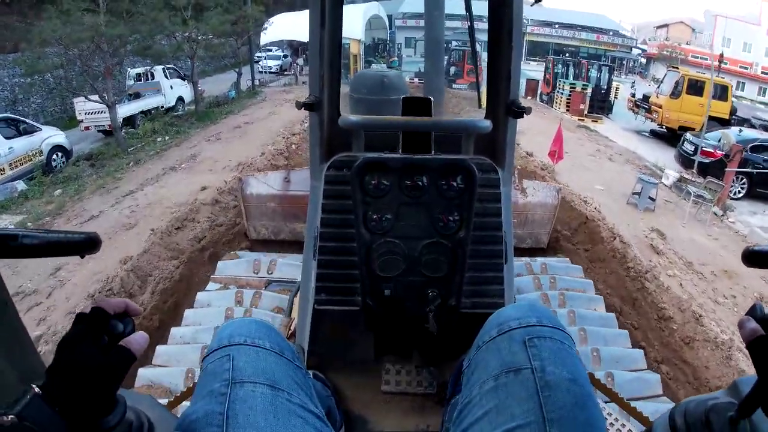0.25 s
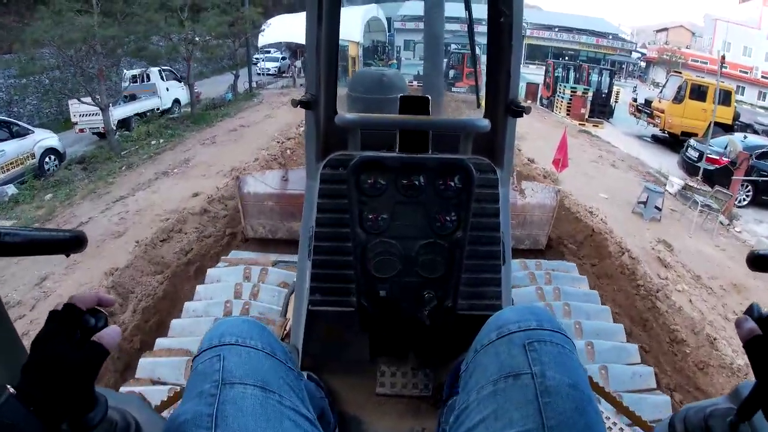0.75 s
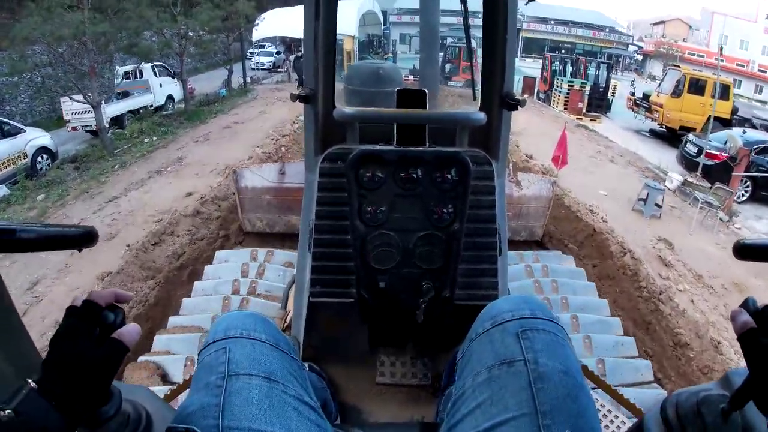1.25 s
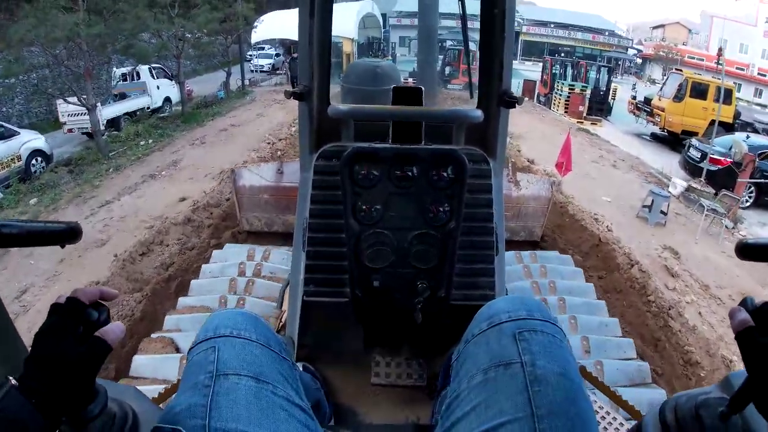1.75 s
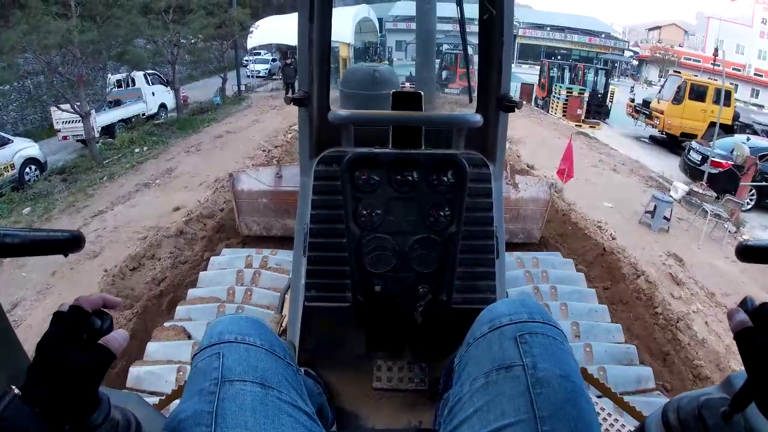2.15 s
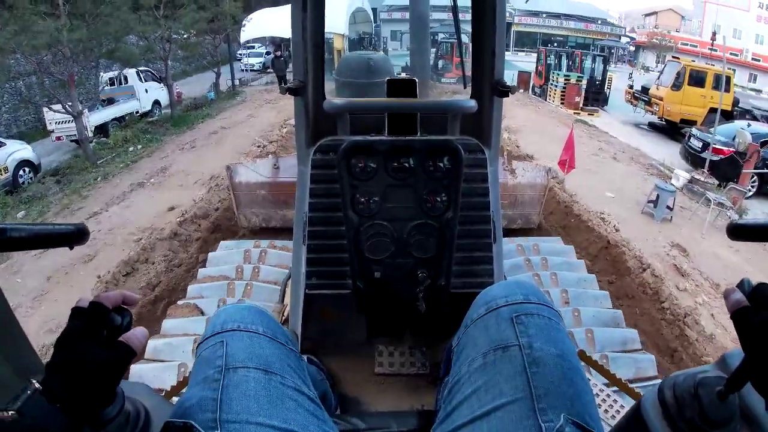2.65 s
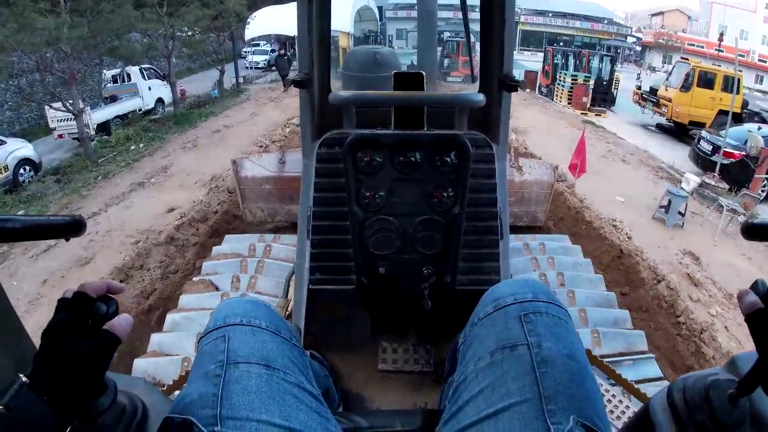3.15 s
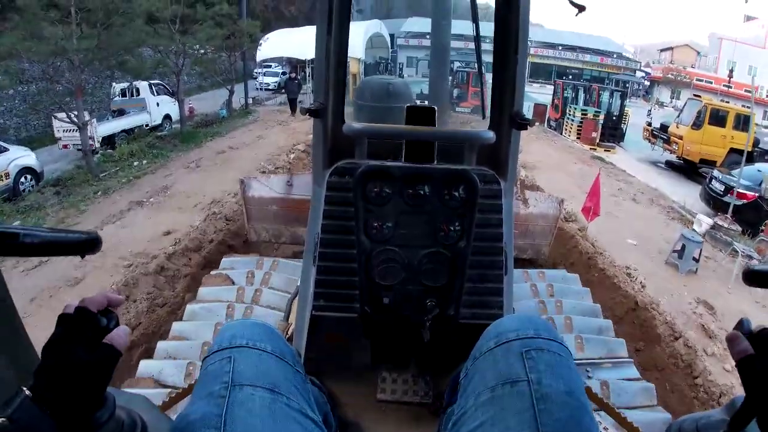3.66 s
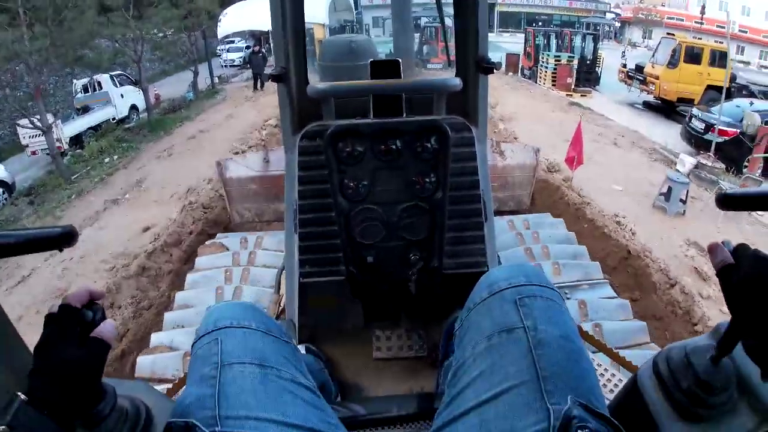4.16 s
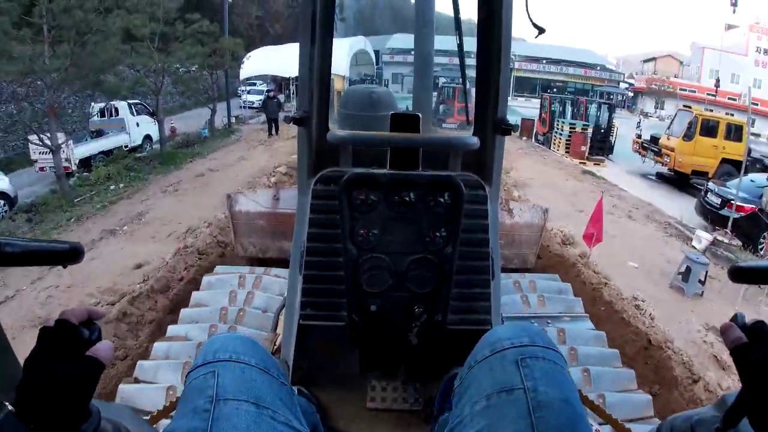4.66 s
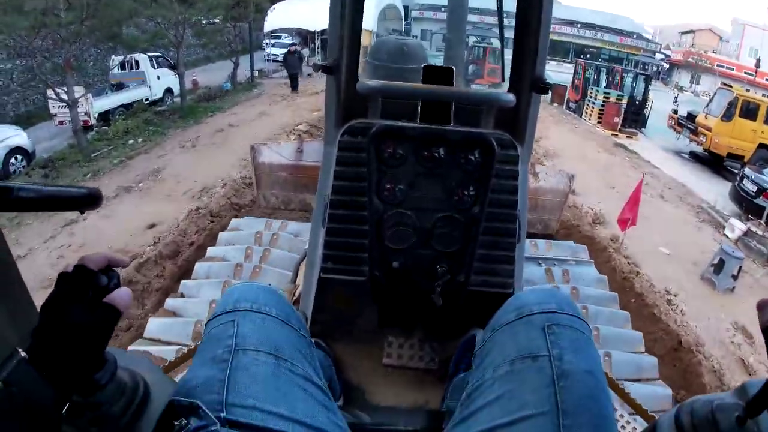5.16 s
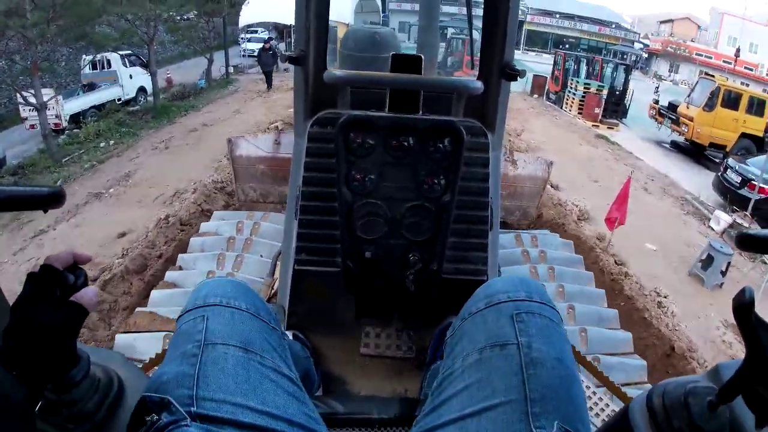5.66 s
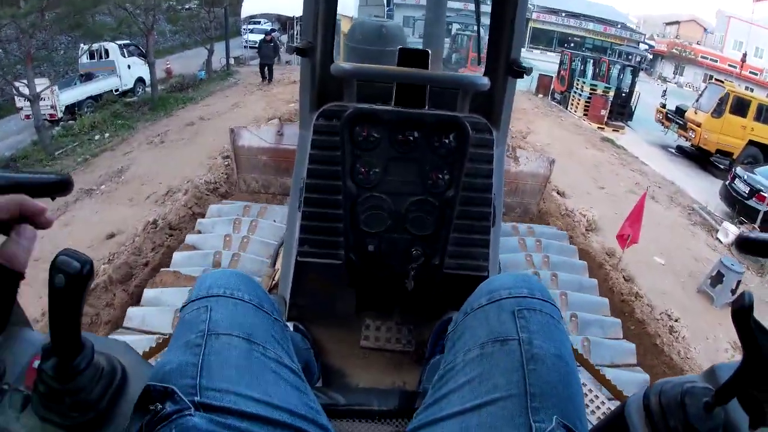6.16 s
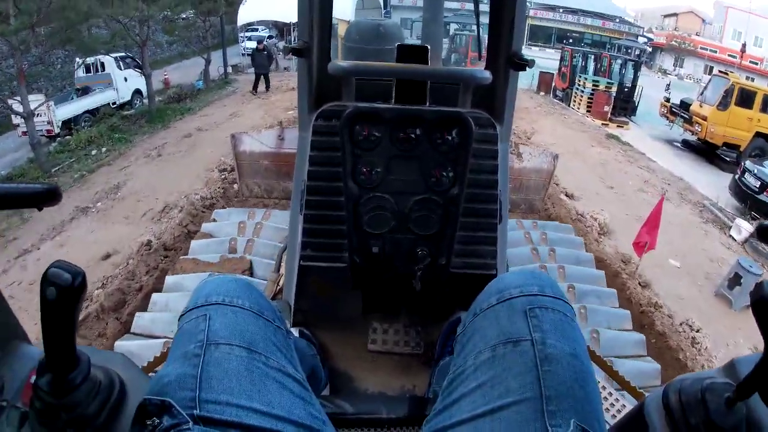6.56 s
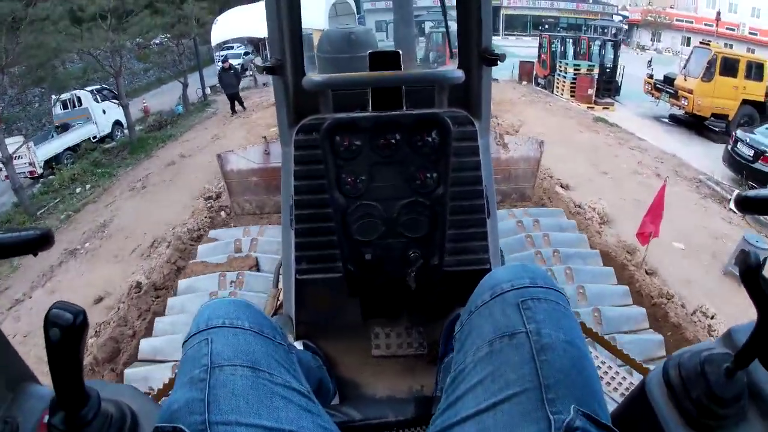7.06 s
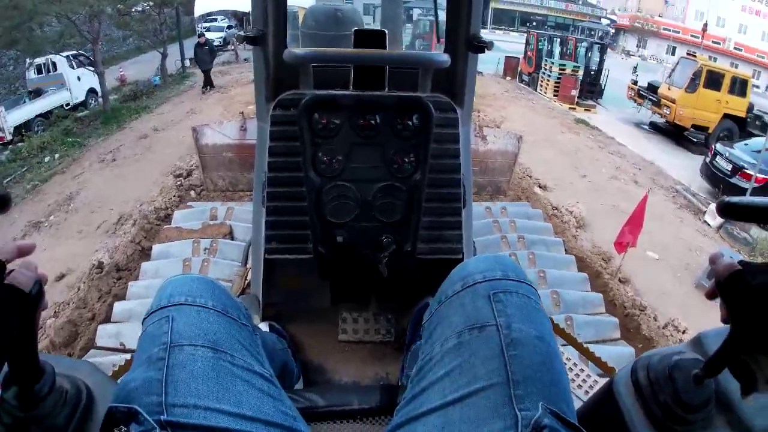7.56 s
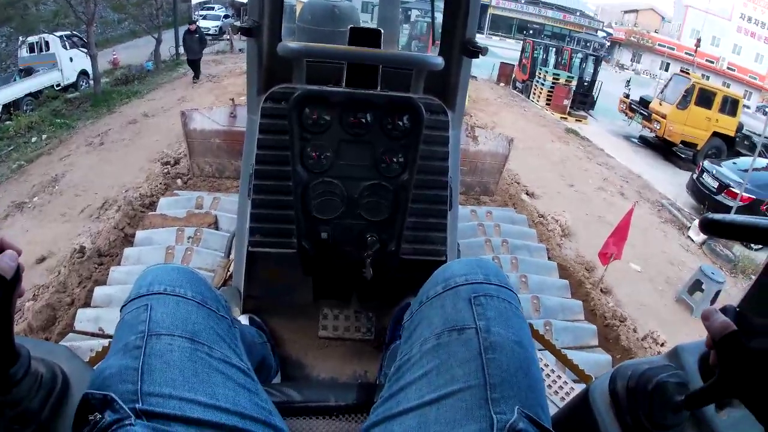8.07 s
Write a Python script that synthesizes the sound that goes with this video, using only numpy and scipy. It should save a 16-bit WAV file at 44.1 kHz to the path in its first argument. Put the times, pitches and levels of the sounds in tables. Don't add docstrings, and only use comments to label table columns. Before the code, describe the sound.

Open-cab bulldozer diesel roars and bogs under repeated load, with low frame booms, rattling panels, track knocks and short dry squeaks, finally dropping toward idle.

```python
import sys
import numpy as np
from scipy import signal
from scipy.fft import rfft, irfft
from scipy.io import wavfile
from scipy.ndimage import uniform_filter1d

SR = 44100
rng = np.random.default_rng(int(sys.argv[2]) if len(sys.argv) > 2 else 0)


def gain_from_db(level_db):
    decades = np.asarray(level_db, float) / 20
    return 10 ** decades


def wav_out(sig):
    wavfile.write(sys.argv[1], SR, np.round(np.clip(np.atleast_2d(sig).T, -1, 1) * 32767).astype(np.int16))


N = 366471


def unit(x):
    return x / np.sqrt(np.mean(x ** 2))


def walk(rate_hz):
    hold = int(SR / rate_hz)
    steps = np.repeat(rng.standard_normal(N // hold + 1), hold)
    slewed = uniform_filter1d(uniform_filter1d(steps, hold), hold)
    return 1.41 * slewed[:N]


def peaks_db(hz, modes):
    return sum(db / (1 + (2 * (hz - f) / width) ** 2) for f, width, db in modes)


def coloured_noise(shape, modes=()):
    hz = np.arange(1, N // 2 + 2) * SR / N
    f, db = np.transpose(shape)
    shape_db = np.interp(np.log(hz), np.log(f), db, -120, -120)
    return rfft(rng.standard_normal(N)) * gain_from_db(shape_db + peaks_db(hz, modes))


def patches(x, patch_hz, patch_s):
    f, t, cells = signal.stft(x, SR, nperseg=1024)
    field = rng.standard_normal(cells.shape)
    field = uniform_filter1d(field, max(1, int(patch_hz / f[1])), axis=0)
    field = uniform_filter1d(field, max(1, int(patch_s / (t[1] - t[0]))), axis=1)
    return cells, f[:, None], unit(field)


def flicker(spectrum, patch_hz, patch_s, patchy_db):
    cells, _, field = patches(irfft(spectrum, N), patch_hz, patch_s)
    return unit(signal.istft(cells * gain_from_db(patchy_db * field), SR)[1][:N])


def add(out, s, sound):
    i = int(s * SR)
    out[i:i + len(sound)] += sound[:N - i]


# start in seconds, end in seconds, pitch in Hz, level in dB rms.
HUMS = [
    (0, 5.1, 597, -40),
    (5.4, 8.6, 802, -48),
    (7.55, 8.8, 732, -46),
    (7.6, 8.8, 700, -47),
    (7.3, 8.1, 544, -41),
    (0, 8.6, 2390, -63),
    (7.9, 8.7, 69.5, -22),
]


def hums():
    t, out = np.arange(N) / SR, np.zeros(N)
    for start, end, hz, db in HUMS:
        swell = np.clip(np.minimum(t - start + 0.21, end - t) / 0.43, 0, 1)
        tone = np.sin(2 * np.pi * hz * t + 0.59 * walk(6))
        out += np.sqrt(2) * gain_from_db(db + 2.0 * walk(6.1)) * swell * tone
    return out


# frequency in Hz, level in dB per Hz.
RUMBLE = [(18, -24), (60, 1), (82, -4.5), (113, -15), (280, -7), (344, -6.5), (477, -19), (566, -19),
          (655, -26.5), (759, -31.5), (831, -27.5), (900, -57), (1170, -67.5), (1980, -120)]


def rumble(db):
    return flicker(coloured_noise(RUMBLE), 61, .1, patchy_db=1.5) * gain_from_db(db - 1.0)


# time in seconds, peak level in dB.
JOLTS = [(.38, -22.5), (.72, -22.5), (.93, -24.5), (1.08, -13.5), (1.36, -22), (1.64, -16.5), (1.89, -14.5),
         (2.21, -18.5), (2.45, -18.5), (2.57, -18), (2.95, -26), (3.15, -19.5), (3.6, -27.5), (3.76, -21.5),
         (3.94, -14), (4.18, -12.5), (4.38, -22.5), (4.6, -19), (4.82, -19), (4.98, -16.5), (5.1, -16),
         (5.38, -21), (5.65, -20.5), (5.97, -16), (6.11, -16.5), (6.63, -15.5), (7.2, -22), (7.34, -19),
         (7.54, -25), (7.74, -24)]
JOLT_RISE_DB_S, JOLT_FALL_DB_S, FRAME_REST_DB = 138.5, 120, -29.5


def jolts():
    t = np.arange(N) / SR
    swells = [db - np.where(t < s, JOLT_RISE_DB_S * (s - t), JOLT_FALL_DB_S * (t - s)) for s, db in JOLTS]
    return np.maximum(np.max(swells, axis=0), FRAME_REST_DB)


SHUDDER_HZ, SHUDDER_WIDTH_HZ = 44.86, 21


def shudder(db):
    hz = np.arange(N // 2 + 1) * SR / N
    mode = 1 / (1 + (2 * (hz - SHUDDER_HZ) / SHUDDER_WIDTH_HZ) ** 2) ** 0.55
    mode *= np.clip(hz / 28, 0, 1) ** 2
    skirt = unit(irfft(rfft(rng.standard_normal(N)) * mode, N))
    boom = np.sin(2 * np.pi * np.cumsum(SHUDDER_HZ * (1 + .035 * walk(8))) / SR)
    return unit(boom + 0.38 * skirt) * gain_from_db(db)


# start in seconds, length in seconds, level in dB.
SCRAPES = [(.13, 0.043, -57), (1.04, 0.016, -54), (3.015, 0.031, -45), (4.004, 0.028, -52),
           (4.069, 0.013, -51), (4.216, 0.037, -45), (5.557, .08, -56), (5.638, 0.024, -52.5),
           (5.85, .07, -44), (5.994, 0.047, -44), (6.106, 0.027, -53), (6.39, 0.098, -57),
           (7.56, 0.024, -49)]


def scrapes():
    out = np.zeros(N)
    band = signal.butter(1, [2500, 6000], "band", fs=SR, output="sos")
    hiss = unit(signal.sosfilt(band, rng.standard_normal(N)))
    hiss = signal.sosfilt(signal.butter(2, 9000, fs=SR, output="sos"), hiss) * gain_from_db(1.5 * walk(150))
    for s, length_s, db in SCRAPES:
        n, i = int(length_s * SR), int(s * SR)
        add(out, s, gain_from_db(db) * np.sin(np.linspace(0, np.pi, n)) * hiss[i:i + n])
    return out


# time in seconds, level in dB.
CLINKS = [
    (7.663, -33),
    (7.679, -49),
]
# frequency in Hz, level in dB, t60 in seconds.
PIN_MODES = [(3170, 3, 0.01502), (5260, 3, 0.02), (7530, -9, .015), (9800, -11, 0.019), (12600, -29, .012)]


def clinks():
    out, t = np.zeros(N), np.arange(int(.05 * SR)) / SR
    ring = sum(gain_from_db(db - 60 * t / t60) * np.sin(2 * np.pi * hz * t) for hz, db, t60 in PIN_MODES)
    for s, db in CLINKS:
        add(out, s, gain_from_db(db) * np.clip(t / .001, 0, 1) * ring)
    return out


# time in seconds, peak level in dB, pitch in Hz.
KNOCKS = [
    (0.507, -23, 550),
    (0.829, -11, 568),
    (2.005, -28, 573),
    (3.899, -11, 542),
    (4.635, -22, 527),
    (6.32, -17, 600),
    (6.614, -25, 524),
    (8.067, -30, 532.7),
    (8.187, -26, 567),
]


def knocks(t60, lift_db):
    out, t = np.zeros(N), np.arange(int(.1 * SR)) / SR
    decay = np.exp(-np.log(1000) * t / t60)
    for s, db, hz in KNOCKS:
        ring = np.sin(2 * np.pi * hz * t) + .5 * np.sin(2 * np.pi * 1.87 * hz * t)
        add(out, s, gain_from_db(db + lift_db) * ring * decay)
    return out


# start in seconds, length in seconds, start pitch in Hz, end pitch in Hz, level in dB.
WHISTLES = [ (0.512, .06, 6400, 6450, -64), (1.631, .115, 5450, 5220, -45), (5.45, .015, 3450, 3410, -52),
            (5.51, .08, 3200, 3800, -55), (5.73, 0.012, 4400, 4800, -43), (5.862, 0.029, 4170, 4060, -50),
            (5.89, .035, 4420, 4480, -46), (5.901, .062, 7140, 7400, -47), (5.951, .022, 4080, 4060, -50),
            (5.989, .02, 5350, 5300, -53), (5.99, .025, 7364, 7350, -56), (5.993, .04, 4450, 4419, -48),
            (6.008, .045, 7360, 7210, -48.5), (6.105, .028, 8400, 8350, -64), (6.41, .03, 5550, 5530, -53)]
WHISTLE_OCTAVE_DB = -21
# start in seconds, length in seconds, pitch in Hz, level in dB, octave in dB over the first partial.
SQUEALS = [
    (0.05, 0.28, 4510, -66, -3),
    (.783, .045, 4420, -63, 6),
    (5.465, 0.068, 4350, -46, -8),
    (5.579, 0.061, 4380, -46, -10),
    (5.699, 0.06, 4320, -45.5, -7),
    (5.725, 0.073, 4440, -61, 11),
]
SQUEAL_RISE_HZ = 60


def squeaks():
    out, grip = np.zeros(N), walk(120)
    waver = .002 * walk(60) + .008 * walk(900)
    rows = [(*row, WHISTLE_OCTAVE_DB) for row in WHISTLES]
    rows += [(s, length_s, hz, hz + SQUEAL_RISE_HZ, db, octave_db) for s, length_s, hz, db, octave_db in SQUEALS]
    for s, length_s, start_hz, end_hz, db, octave_db in rows:
        n, i = int(length_s * SR), int(s * SR)
        hz = np.linspace(start_hz, end_hz, n) * (1 + waver[i:i + n])
        turns = 2 * np.pi * np.cumsum(hz) / SR
        overtones = np.sin(2 * turns) + gain_from_db(-20) * np.sin(3 * turns)
        tones = np.sin(turns) + gain_from_db(octave_db) * overtones
        swell = np.sin(np.pi * np.linspace(0, 1, n) ** 0.8) ** 0.75
        add(out, s, gain_from_db(db + 4.5 + 3 * grip[i:i + n]) * swell * tones)
    return out


# frequency in Hz, level in dB per Hz.
CLATTER = [(290, -33), (500, -12.5), (586, -0.5), (629, -6), (748, -11.5), (816, -13.5), (902, -13.5),
           (1470, -13.5), (1910, -20.5), (2470, -19), (3540, -27.5), (4930, -29.5), (7270, -42.5),
           (12400, -51), (15600, -65.5)]
# frequency in Hz, width in Hz, lift in dB.
PANELS = [(538.6, 28, 11.5), (600, 25, -0.5), (831, 26, 5.5), (1334, 130, 2.5), (1493, 59, 5),
          (2378, 13, 7), (4580, 100, -1.5), (5650, 1000, 3.5)]
CLATTER_DB, CLATTER_DB_PER_HZ, CLATTER_DB_PER_HZ_S = -38, 0.17, 0.0308


def clatter(db):
    noise = flicker(coloured_noise(CLATTER, PANELS), 70, .07, patchy_db=1.4)
    treble = signal.sosfiltfilt(signal.butter(2, 3000, "high", fs=SR, output="sos"), noise)
    brighter = gain_from_db(0.4 * (db - db.mean())) - 1
    return (noise + treble * brighter) * gain_from_db(db + 6.5)


# time in seconds, level in dB.
EFFORT = [(0, 0), (.85, 1), (1.05, -2), (1.5, .5), (2.4, -1), (2.9, .5), (3.2, -1), (3.55, 0), (4.1, -1.5),
          (4.5, -0.5), (5.05, -2), (5.27, -3.5), (5.55, -1), (6.4, 0), (6.7, -2), (7.15, 0.5), (7.55, -0.5),
          (8.31, 1.5)]


def effort():
    s, db = np.transpose(EFFORT)
    return np.interp(np.arange(N) / SR, s, db)


# ease time in seconds, firing rate then in Hz, rate the governor pulls to in Hz,
# pull time in seconds, bite time in seconds.
SHOVES = [ (0, 66.7, 66.6, .2, .3), (.47, 66.6, 70.1, .17, .7), (1.11, 58.3, 58.3, .03, 1.15),
          (1.16, 58.3, 72.8, .27, 1.44), (1.88, 57.1, 69.2, .19, 2.12), (2.52, 57.3, 74, .26, 2.84),
          (3.13, 65.3, 63.2, .12, 3.25), (3.27, 63.2, 73, .24, 3.52), (3.7, 71.9, 68.5, .11, 3.81),
          (4.07, 64.9, 60.2, .09, 4.16), (4.17, 60.2, 70.4, .16, 4.33), (4.35, 70.4, 74.8, .25, 4.6),
          (4.79, 71.7, 73.2, .13, 4.93), (5.17, 72, 63.9, .2, 5.37), (5.38, 63.9, 68, .26, 5.64),
          (5.66, 68, 71, .75, 6.52), (6.69, 66.3, 66.1, .2, 7.31), (7.92, 47.3, 45.7, .15, 8.3)]


def speed():
    t, hz = np.arange(N) / SR, np.zeros(N)
    following = SHOVES[1:] + [(N / SR + 1, SHOVES[-1][2])]
    for (s, low_hz, aim_hz, pull_s, bite), (end, next_low_hz, *_) in zip(SHOVES, following):
        rise = np.sin(np.pi / 2 * np.clip((t - s) / pull_s, 0, 1)) ** 2
        sag = np.clip((t - bite) / max(end - bite, .01), 0, 1)
        shove_hz = low_hz + (aim_hz - low_hz) * rise + (next_low_hz - aim_hz) * sag
        hz = np.where(t >= s, shove_hz, hz)
    return uniform_filter1d(hz, int(0.053 * SR))


# multiple of the firing rate, level in dB rms, share of the surge.
ORDERS = [(1.5, -40.5, .5), (2, -34, .5), (2.1, -37.5, .1), (2.5, -36.5, .5), (3, -29, 2), (4, -32, .8),
          (5, -31.5, .8), (6, -38.5, .3), (7, -49, .5), (8, -45.5, .5)]
# frequency in Hz, width in Hz, lift in dB.
PIPE = [(70, 10, 7), (143, 14, 8), (198, 24, 4), (265, 16, 8), (360, 23, 7), (418, 20, 2.5), (441, 22, 17)]
FIRING_DB, SURGE_DB_PER_HZ_S, IDLE_FADE_DB = -22, 0.0316, 8.5


def firing(hz, choke_db, effort_db):
    turns = 2 * np.pi * np.cumsum(hz * (1 + 0.0019 * walk(25))) / SR
    surge_db = SURGE_DB_PER_HZ_S * np.clip(np.gradient(hz) * SR, -30, 80)
    levels = [(1, FIRING_DB + peaks_db(hz, PIPE) + surge_db - choke_db)]
    for k, db, share in ORDERS:
        drive_db = share * surge_db + 0.92 * effort_db
        levels.append((k, db + peaks_db(k * hz, PIPE) + drive_db + 2.3 * walk(9)))
    out = np.zeros(N)
    for k, db in levels:
        phase = k * turns + 2 * np.pi * rng.random() + .06 * k * walk(14)
        out += np.sqrt(2) * gain_from_db(db + 1.13 * walk(16)) * np.sin(phase)
    return out


def scene():
    hz, shudder_db, effort_db = speed(), jolts(), effort()
    gaining_hz_s = uniform_filter1d(np.clip(np.gradient(hz) * SR, -40, 20), int(.08 * SR))
    work_db = effort_db + CLATTER_DB_PER_HZ * (np.maximum(hz, 57) - 67) + CLATTER_DB_PER_HZ_S * gaining_hz_s
    choke_db = 0.3 * (shudder_db - shudder_db.mean())
    idle = np.clip((54 - hz) / 6, 0, 1)
    gas = rumble(-18.5 + 0.15 * work_db + 0.98 * walk(9))
    body = hums() + gas + shudder(shudder_db - 5 * idle) + clatter(CLATTER_DB + work_db)
    tracks = scrapes() + clinks() + knocks(t60=0.077, lift_db=-13) + squeaks()
    engine = firing(hz, choke_db, effort_db - IDLE_FADE_DB * idle)
    return (body + tracks + engine)[None]


def mottle_treble(x):
    cells, hz, field = patches(x, 170, .07)
    patch_floor = np.interp(hz, [5500, 8000, 12000, 13500, 15700], [-3, -1.1, -.5, -.3, .3])
    size = uniform_filter1d(np.abs(cells), 3, axis=1)
    faint = size < uniform_filter1d(size, 15, axis=0) * np.interp(hz, [5000, 8000, 12000], [0, .75, .95])
    edge_hz = 14500 + 600 * walk(40) + 500 * walk(3)
    above_edge = hz > edge_hz[np.linspace(0, N - 1, cells.shape[1]).astype(int)]
    muted = (field < patch_floor) | faint | above_edge
    return signal.istft(cells * np.where(muted, .02, 1), SR)[1][:N]


def band_limit(x):
    return signal.sosfilt(signal.butter(12, 15740, fs=SR, output="sos"), x)


def record(dry):
    limited = np.tanh(1.1 * dry[0]) / 1.1
    return band_limit(mottle_treble(limited)[None])


dry = scene()
out = record(dry)
wav_out(out)
```